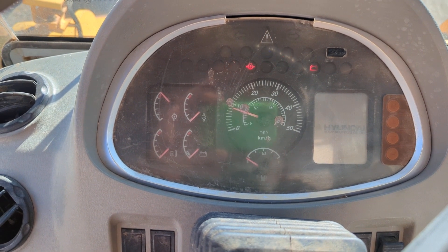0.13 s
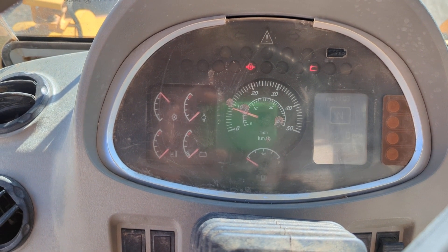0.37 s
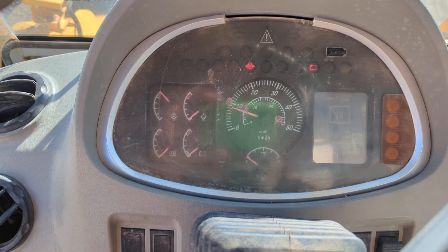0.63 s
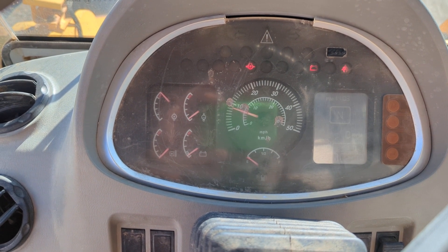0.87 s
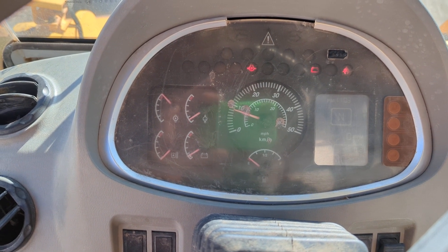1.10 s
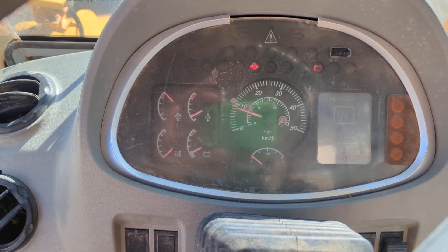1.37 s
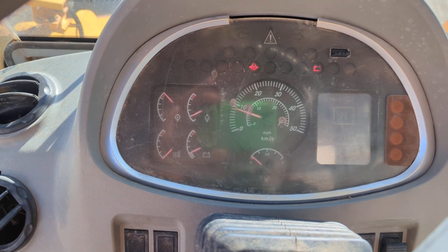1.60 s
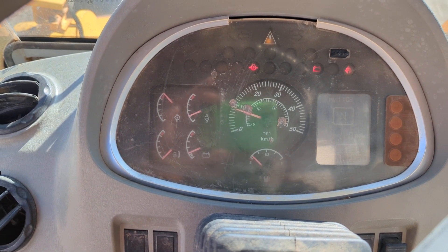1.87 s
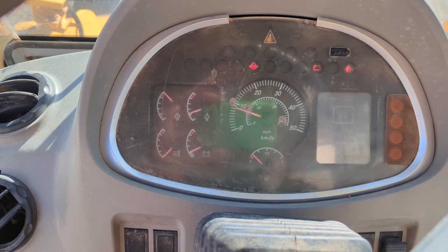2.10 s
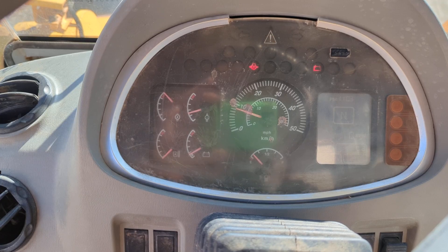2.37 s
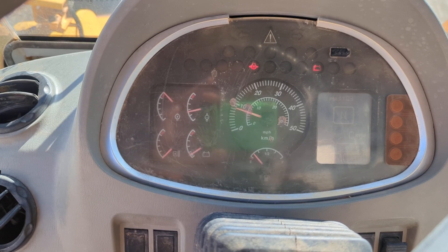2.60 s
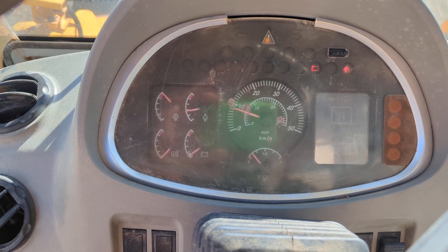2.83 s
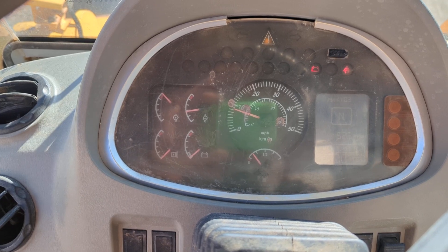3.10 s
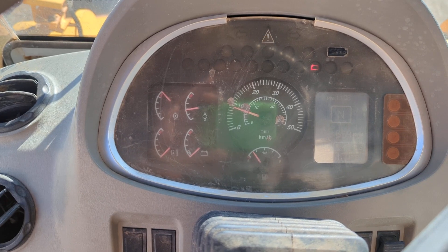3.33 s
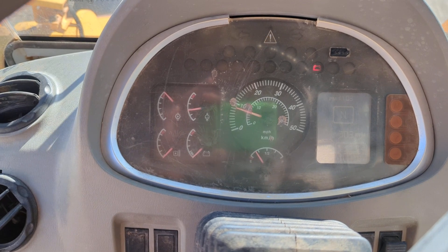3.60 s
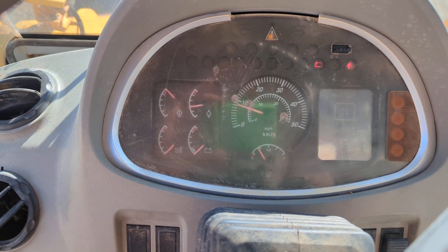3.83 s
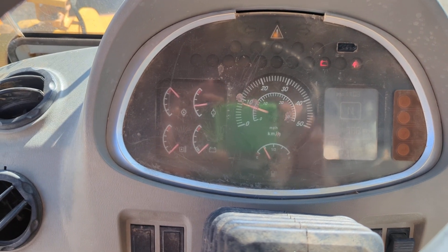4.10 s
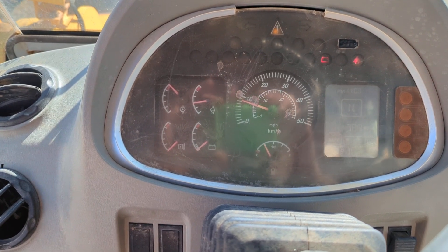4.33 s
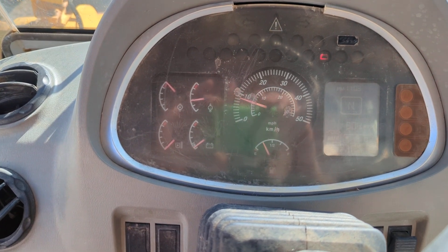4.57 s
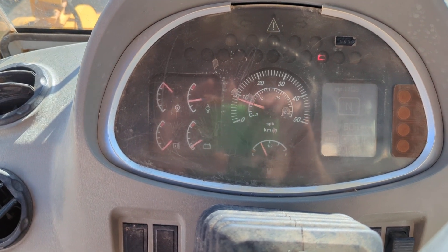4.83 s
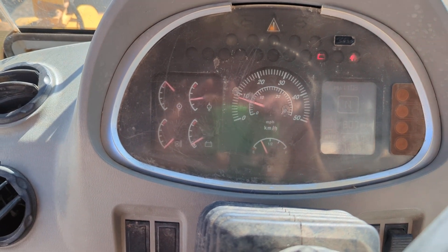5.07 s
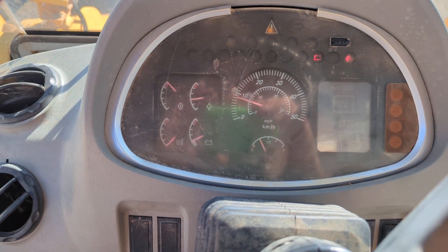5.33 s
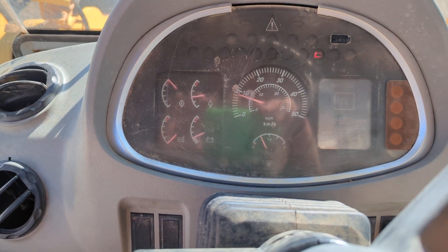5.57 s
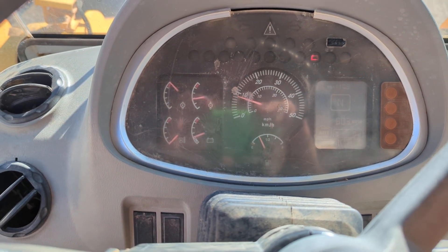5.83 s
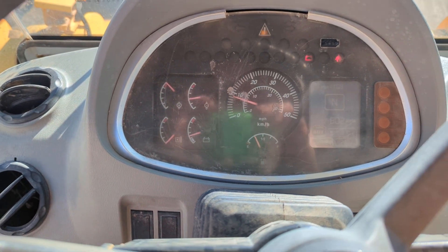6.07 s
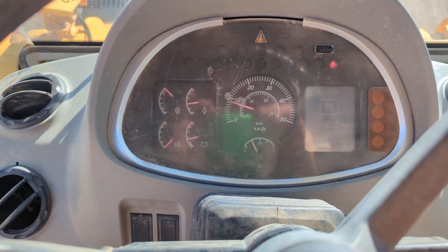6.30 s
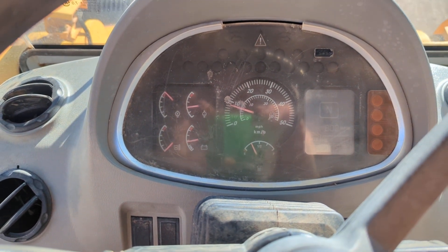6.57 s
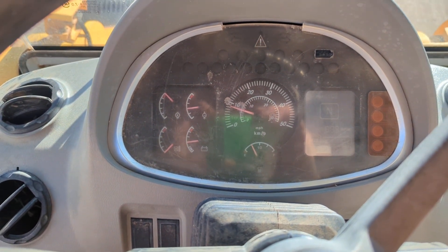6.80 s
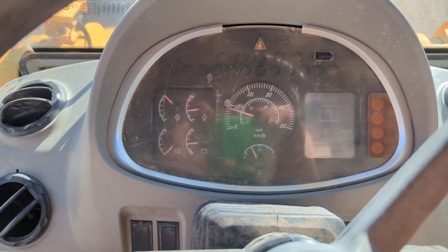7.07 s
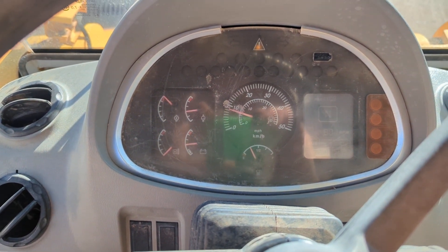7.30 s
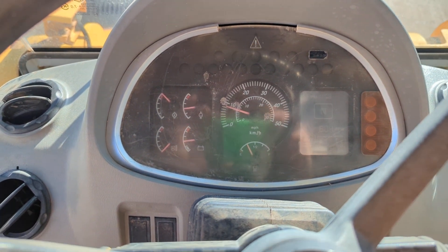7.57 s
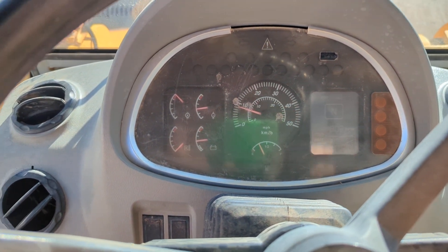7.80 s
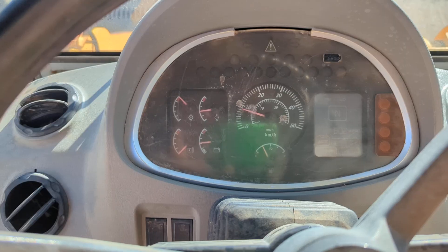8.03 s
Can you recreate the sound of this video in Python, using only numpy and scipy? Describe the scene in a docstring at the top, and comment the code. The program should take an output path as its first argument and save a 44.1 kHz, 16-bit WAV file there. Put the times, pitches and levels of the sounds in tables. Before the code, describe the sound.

Heard inside a heavy machine's cab on a hand-held phone: about a second of near silence, a small clack, then a geared starter whirs up and labours in rough, sagging pulses. A large diesel catches with slow puffs, gathers speed and settles into a deep, even drone with muffled clatter, pump whine and a wavering high rotor tone.

```python
"""Diesel start, inside the cab

A six-cylinder diesel is started, heard from inside the cab on a hand-held phone with two microphone ports.
The starter, an array of gear-mesh tones with grind and rasp, whines and sags against each compression.
The engine catches, runs up and idles: tones locked to the firing rate over pulsing noise; pumps and a rotor sing.
The phone filters its bass in 10 ms blocks, which mirrors the deepest tones around multiples of 100 Hz."""
import sys
import numpy as np
from scipy import signal
from scipy.fft import rfft, irfft, next_fast_len
from scipy.io import wavfile
from scipy.ndimage import uniform_filter1d, map_coordinates

SR = 44100
rng = np.random.default_rng(int(sys.argv[2]) if len(sys.argv) > 2 else 0)


def output_pcm(signal):
    """Save a mono or channel-first signal as 16-bit PCM at the path in sys.argv[1].

    Samples are clipped to [-1, 1] before scaling.
    """
    pcm = np.clip(np.atleast_2d(signal).T, -1, 1) * 32767
    wavfile.write(sys.argv[1], SR, np.round(pcm).astype(np.int16))


def volts_from_db(level):
    """Convert decibel levels to linear amplitude ratios."""
    exponent = np.asarray(level, float) / 20
    return 10 ** exponent


N = 360297
TIME = np.arange(N) / SR  # s

# Cab air swaying on its mounts [t/s, relative level/dB]
SWAY = [(0, -37), (.2, -39), (.75, -49), (1.1, -45), (1.5, -44), (2.28, -44), (2.44, -28.5), (2.65, -21),
        (3.5, -39.5), (8.17, -39)]
# The cranked engine lurches on its mounts [t/s, relative peak level/dB, half length/s]
LURCHES = [(1.207, -26.5, 0.037), (1.314, -29, .03), (1.392, -19, .03), (1.565, -26.5, .03),
           (1.72, -29.5, 0.03), (1.783, -33, 0.031), (1.848, -30, 0.057), (1.988, -26.5, 0.023),
           (2.058, -24, .025), (2.23, -27, 0.034), (2.337, -25, 0.023), (2.391, -19.5, 0.031),
           (2.52, -17, .02), (2.575, -15.5, 0.022)]
# Colour of the cab sway [f/Hz, density/dB]
SWAY_COLOUR = [(18, -50), (30, -24), (43, -1), (59, 0), (70, -16.5), (80, -26), (100, -42), (180, -120)]
# Colour of the still air [f/Hz, density/dB]
STILL_AIR_COLOUR = [(53, -33), (80, 6), (100, -3), (154, -8), (190, -30), (222, -7), (274, -12.5),
                    (305, -6.5), (420, -32), (532, -14), (1060, -22), (1730, -22.5), (2430, -37.5),
                    (15000, -62)]
# Clacks of key, relay, pinion and loose trim
# [t/s, relative level/dB, centre f/Hz, ring to -60 dB/s, sharp edge 0-1]
TICKS = [(1.016, -55, 2200, 0.16, 0), (1.087, -59, 2000, .08, 0), (1.1, -52, 2500, 0.12, 0.1),
         (1.126, -32.5, 3340, 0.11, 0.3), (2.62, -40, 10900, 0.065, 0.3), (5.108, -46, 4500, .004, 1),
         (5.308, -35, 4500, .004, 0.93), (7.152, -42, 4500, .004, 1), (7.5797, -24.5, 3570, 0.0054, 0.87)]

# Starter spinning up over the first turn [t/s, tooth mesh f/Hz, whine level/dB, grind level/dB]
SPIN_UP = [(1.083, 300, -76, -64), (1.09, 295, -75, -49.5), (1.122, 402, -66, -46),
           (1.13, 500.4, -45, -36.5), (1.2, 760, -49, -35.5), (1.3, 1000, -38.5, -35),
           (1.35, 1143, -39.5, -39), (1.39, 1081, -36.5, -33), (1.43, 1002, -36, -34.5),
           (1.48, 768, -52, -35.5)]
# Compressions that brake the starter [t/s, length/s, mesh f at the start/Hz, sag/Hz, whine level/dB]
STROKES = [(1.537, .093, 742.6, 226, -37), (1.687, .083, 768, 170.2, -36),
           (1.827, 0.075, 778.6, 137.5, -36), (1.961, 0.069, 773, 149, -35),
           (2.086, .079, 781.5, 161, -35.5), (2.237, 0.024, 855, 25, -35.5)]
# Shape of a stroke, levels over the stroke's whine
# [share of its length, share of the sag, whine level/dB, grind level/dB]
STROKE_SHAPE = [(0, 0, 0, -1), (.68, .75, -7, 4), (1, 1, -14.5, -2.5)]
# The mesh, its overtones and lower tones of unevenly worn teeth [multiple of mesh, relative level/dB]
TEETH = [(.25, -9), (.5, -12), (1, 0), (1.5, -9), (1.75, -9), (2, -1), (3, -14), (4, -14), (6, -19),
         (8, -25)]
# Starter housing resonances [f/Hz, width/Hz, gain/dB]
HOUSING = [(745, 45, -3), (1090, 90, 1), (1470, 120, 0), (1700, 120, -5), (2250, 150, -9), (4480, 150, -8),
           (6300, 100, -10)]
# Colours of the starter grind, its rasp and the ringing lowest housing mode [f/Hz, density/dB]
GRIND_COLOUR = [(85, -30), (122, 5.5), (156, -3), (188, -25), (236, 1.5), (576, -13.5), (739, -0.5),
                (910, -8), (1070, -4.5), (1240, -9.5), (1500, 0.5), (3360, -19), (4410, -21.5),
                (5100, -31.5), (15000, -42.5)]
RASP_COLOUR = [(1470, -37), (2500, -2), (2760, -0.5), (3560, -18), (4320, -12), (4840, -14), (6290, -15),
               (9570, -29.5), (15000, -29)]
RINGING_COLOUR = [(660, -120), (700, -30), (735, -3), (745, 0), (757, -3), (795, -30), (850, -120)]

# Song of the belt-driven rotor [t/s, level/dB]
ROTOR = [(2.7, -62), (3.35, -48), (3.55, -40), (3.95, -68), (4.27, -36.5), (4.7, -35), (5.2, -33.5),
         (5.7, -32.5), (6.5, -35.5), (7.3, -28.5), (7.65, -32), (8.17, -28.5)]
# The song drops out briefly [t/s, depth/dB]
DROPOUTS = [(4.35, 22), (4.5, 20), (4.9, 33), (5.35, 18), (5.58, 12), (5.85, 25), (6.14, 24), (6.81, 7),
            (7.57, 15)]
# A whistle that rises during the run-up [t/s, f/Hz, relative level/dB]
WHISTLE = [(3.3, 1030, -60), (3.4, 1047, -47), (3.7, 1085, -40), (3.9, 1137, -43), (3.98, 1150, -62)]

# Running engine [t/s, relative clatter level/dB]
CLATTER_LEVEL = [(2.25, -56), (2.48, -39), (2.63, -36.5), (2.74, -37.5), (4.23, -37), (4.74, -35),
                 (6.04, -34.5), (7.21, -35.5), (7.48, -32), (7.74, -34.5), (8.17, -35.5)]
# Colours of the clatter, drone and hiss [f/Hz, density/dB]
CLATTER_COLOUR = [(240, -49), (400, -12), (433, -14), (540, -3.5), (607, -11.5), (852, -11.5), (1280, -8),
                  (1530, -8.5), (1890, -10.5), (2070, -16), (2900, -24), (3660, -27.5), (9000, -50.5),
                  (11700, -81), (19800, -120)]
DRONE_COLOUR = [(50, -44), (85, -1), (119, -3), (156, -6.5), (188, -24), (224, -3.5), (269, -6.5),
                (340, -3.5), (443, -23), (520, -16.5), (680, -44), (1140, -120)]
HISS_COLOUR = [(2940, -22), (5000, -19), (6310, 3.5), (7240, -4), (8080, 2.5), (9910, -7), (11900, -2),
               (15000, -8.5), (15600, -12.5)]
# Dips that cab reflections cut into the noise [f/Hz, width/Hz, depth 0-1]
DIPS = [(847, 25, 0.73), (2860, 43, 0.3), (4150, 31, 0.5), (5000, 66, 0)]

# Engine speed [t/s, firings per s]
SPEED = [(2.2, 12.0), (2.66, 24.1), (2.82, 29.7), (3.0, 32.85), (3.15, 35.0), (3.3, 35.67), (3.5, 37.24),
         (3.7, 37.89), (3.9, 39.17), (4.1, 40.22), (4.3, 40.5), (4.6, 40.46), (5.2, 40.19), (5.8, 40.1),
         (6.4, 39.98), (7.0, 40.05), (7.3, 40.5), (7.6, 40.01), (7.9, 40.1), (8.17, 40.66)]
# Exhaust boom [multiple of the firing rate, relative level/dB, waver/dB]
EXHAUST = [(1, 0, 0.4), (2, -11.5, 1), (3, -22, 2)]
# How the cab answers the boom at each pitch [f/Hz, rms level/dB]
CAB_ANSWER = [(12, -72), (24, -50), (30, -48), (33, -43), (35.3, -24), (37.5, -17), (40, -17), (48, 0),
              (53, 0), (60, -4), (66, -14.5), (72, -10.5), (80, -14.5), (90, -5.5), (100, -7), (108, -22),
              (120, -18)]
# Weaker tones that follow the first exhaust order [multiple of the firing rate, level relative to it/dB]
MINOR = [(4 / 3, -19.5), (7 / 3, -36), (4, -16.5), (6, -28), (9, -27), (15, -34.5), (16, -32), (17, -37.5)]
# Pump as the oil pressure builds [t/s, pistons level/dB, gear teeth level/dB]
PRESSURE = [(2.2, -58, -80), (2.7, -38, -68), (3.2, -48, -67), (3.55, -35, -60), (3.9, -42.5, -60),
            (4.15, -36, -39.5), (4.6, -42.5, -45.5), (5.2, -33.5, -39.5), (6.2, -31.5, -38),
            (7.0, -32, -38.5), (8.17, -32, -45)]
# Pump pistons [multiple of the firing rate, relative level/dB]
PISTONS = [(6, -9), (8, 0.5), (12, -11)]
# Pump gear teeth [multiple of the firing rate, relative level/dB]
GEAR = [(32, 0.5), (48, -1)]
# A third gear tone comes and goes [t/s, level/dB]
THIRD_GEAR = [(4.3, -63), (4.6, -35), (6.15, -47), (6.4, -56), (7.1, -63), (7.3, -38), (7.6, -52),
              (8.17, -68)]
# Pump overtones that follow the gear teeth [multiple of the firing rate, level relative to them/dB]
PUMP_OVERTONES = [(30, -22), (40, -16), (44, -8), (52, -15), (56, -10), (60, -23.5), (64, -15), (68, -18.5),
                  (113, -32.5), (133, -36)]
# Pump orders that sweep through a panel resonance [multiple of the firing rate, level at resonance/dB]
SWEEPING = [(14, -46.5), (16, -46.5), (18, -47)]
LOW_SWEEPING = [(12, -29), (16, -39)]
# The two panel resonances (f/Hz, width/Hz)
PANEL = (532, 48)
LOW_PANEL = (328, 44)

# Likeness of the two microphone ports [f/Hz, likeness, held within -1 to 1]
ALIKE = [(60, 1), (130, 0.63), (300, 1.36), (640, 0.62), (1400, 0.44), (3000, 0.29), (8000, 0.04)]
# Phase by which the left port leads for a source fully aside [f/Hz, lead/rad]
LEAD = [(0, 0), (690, 0.95), (1550, 3), (2000, 6), (16000, 48)]
# Left port over right [f/Hz, level/dB]
BALANCE = [(60, 0.0), (120, -0.5), (240, 0.0), (480, 0.0), (950, -0.5), (1890, -2.0), (3770, 3.5),
           (7520, 2.0), (15000, -0.5)]
# Loss of the deepest bass in both ports [f/Hz, gain/dB]
LOW_CUT = [(15, -40), (28, -31.5), (36, 0)]
# What the phone's block filter acts on [f/Hz, gain/dB]
DEEP = [(25, -18), (35, 1.5), (50, -6), (62, -14.5), (75, -31), (100, -63)]
# How strongly the mirror tones come out [f/Hz, gain/dB]
MIRROR = [(15, -42), (35, -1), (60, 8.5), (100, -6), (140, -8), (160, -10.5), (240, -22), (265, -19.5),
          (340, -32.5), (500, -50)]


def unit(x):
    """Scaled to rms 1."""
    return x / np.sqrt(np.mean(x ** 2) + 1e-20)


def along(points, hz):
    """Reads a table of (Hz, value) on a log frequency axis."""
    f, v = np.transpose(points)
    return np.interp(np.log(hz + 1), np.log(f + 1), v)


def curves(rows, before=-120):
    """One value per sample for each column after the time."""
    s, *cols = np.transpose(rows)
    return [np.interp(TIME, s, c, left=before) for c in cols]


def bumps(rows):
    """Sum of bell shapes from rows (s, height, half length s)."""
    return sum(height * np.exp(-((TIME - s) / half) ** 2) for s, height, half in rows)


def wobble(rate):
    """A smooth random curve, rate knots a second."""
    return map_coordinates(rng.standard_normal(int(N * rate / SR) + 4), [TIME * rate])


def filtered(x, response):
    """x times a complex response of frequency."""
    m = next_fast_len(N + 8192)
    return irfft(rfft(x, m) * response(np.fft.rfftfreq(m, 1 / SR)), m)[..., :N]


def rush(colour, gate=1):
    """Two unrelated paths of coloured noise, both gated alike, rms 1."""
    noise = gate * rng.standard_normal((2, N))
    return unit(filtered(noise, lambda hz: volts_from_db(along(colour, hz))))


def tone(phase, db, waver_db):
    """A sine of rms db that wavers in level; its second path arrives with a drifting phase."""
    drift = np.array([0 * TIME, 2.06 * wobble(3)])
    return np.sqrt(2) * volts_from_db(db + waver_db * wobble(5)) * np.cos(phase + drift)


def cab():
    """Still air as steady coloured noise, and the deep rocking of the cab, strongest before an even run."""
    rocking = volts_from_db(curves(SWAY)[0] + 3.3 * wobble(14))
    rocking = rocking + bumps([(s, volts_from_db(db), half) for s, db, half in LURCHES])
    sway = rush(SWAY_COLOUR)
    # a lightly damped sway keeps its size for a few cycles
    sway /= np.sqrt(uniform_filter1d(sway ** 2, 1800)) + 0.23
    still_air = volts_from_db(-52.0 + 0.72 * wobble(4)) * rush(STILL_AIR_COLOUR)
    return rocking * volts_from_db(0.5) * unit(sway) + still_air


def ticks():
    """Each clack, close to both ports, is a sharp edge and a dying noisy ring around its centre."""
    out, t = np.zeros((2, N + SR)), np.arange(SR // 6) / SR
    for s, db, hz, ring, edge in TICKS:
        envelope = volts_from_db(-60 * t / max(ring, .002)) * (1 - np.exp(-t / 0.0021))
        noise = rng.standard_normal((3, len(t))) * envelope
        clack = .5 * (noise[0] + noise[1:])  # one part shared by both ports
        clack[:, 0] = -5 * edge
        band = signal.butter(2, [hz / 2.2, min(hz * 1.6, 20000)], "band", fs=SR)
        start = round(s * SR)
        out[:, start:start + len(t)] += volts_from_db(db + 6) * signal.lfilter(*band, clack)
    return out[:, :N]


def starter_controls():
    """Mesh Hz, whine dB and grind dB: the spin-up, then each stroke bites, sags and lets the pinion run free."""
    bite_s, release_s = .01, 2.35  # how fast a stroke loads up; when the pinion drops out
    free_whine_db, free_grind_db = -26, -5.5  # running free, relative to the next stroke's whine
    louder_db_per_hz = 0.0491  # the further the mesh sags, the louder it labours
    rows = list(SPIN_UP)
    for s, length, hz, sag, db in STROKES:
        rows.append((s - bite_s, hz, db + free_whine_db, db + free_grind_db))
        for share, sag_share, whine, grind in STROKE_SHAPE:
            sagged = sag_share * sag
            whine_db = db + whine + louder_db_per_hz * sagged
            rows.append((s + share * length, hz - sagged, whine_db, db + grind))
    last_hz = rows[-1][1]
    rows += [(release_s, last_hz, -90, -46.5), (release_s + 0.11, last_hz, -120, -70),
             (release_s + .2, last_hz, -120, -120)]
    return curves(rows)


def starter():
    """Worn pinion teeth whine roughly at the mesh rate and grind; the whine rings the housing.
    Against a compression the mesh slows, loads up, turns rougher and brighter, and rasps."""
    mesh_hz, whine_db, grind_db = starter_controls()
    load = np.clip((1000 - mesh_hz) / 250, 0, 1)
    roughness = .021 + .017 * load
    mesh = 2 * np.pi * np.cumsum(mesh_hz * (1 + roughness * wobble(300))) / SR

    whine = 0
    for k, db in TEETH:
        # load weakens the mesh tone itself; running free weakens the high overtones
        brightness_db = -6 * load * (k == 1) - 7 * (1 - load) * (k > 4)
        rough_db = (3.5 + load) * wobble(150)
        whine = whine + tone(k * mesh, whine_db + db + brightness_db + rough_db, waver_db=.8)

    def housing(f):
        return 0.54 + sum(volts_from_db(db) / (1 + (2 * (f - c) / w) ** 2) for c, w, db in HOUSING)

    whine = volts_from_db(-.5) * filtered(whine, housing)
    grind = volts_from_db(grind_db - 1.06) * rush(GRIND_COLOUR, volts_from_db(1.1 * wobble(200)))
    rasp = load * volts_from_db(whine_db - 10) * rush(RASP_COLOUR, volts_from_db(1.9 * wobble(400)))
    # grit rings the lowest housing mode
    ringing = load * volts_from_db(grind_db - 12.5) * rush(RINGING_COLOUR, volts_from_db(3 * wobble(30.2)))
    return whine + grind + rasp + ringing


def firing_phase():
    """Radians of the firing cycle, the running sum of the engine speed."""
    crank_start = 4.05  # phase at time zero, rad
    return 2 * np.pi * np.cumsum(curves(SPEED, before=0)[0]) / SR + crank_start


def rotor(phase):
    """The slot tone swells once a turn and bends in pitch with it; belt slip lets it drift; a whistle rises."""
    turns_per_firing, slots = .3785, 36
    turn = turns_per_firing * phase + 2.6
    swell = 1 + 0.5 * np.cos(turn) + 0.22 * np.cos(2 * turn + wobble(5.1))
    bend_and_slip = -.5 * np.sin(turn) + .6 * wobble(3) + .22 * wobble(25)
    dropout_db = bumps([(s, db, 0.041) for s, db in DROPOUTS])  # half length 0.041 s
    song = swell * tone(slots * turn + bend_and_slip, curves(ROTOR)[0] - dropout_db, waver_db=0.3)
    hz, db = curves(WHISTLE)
    whistle_phase = 2 * np.pi * np.cumsum(hz + 16 * wobble(40)) / SR
    return song + tone(whistle_phase, db + 2, waver_db=1.5)


def engine_noise(phase):
    """Combustion clatter and drone pulse a little with each firing, the clatter unevenly by cylinder; hiss."""
    clatter_db, = curves(CLATTER_LEVEL)
    over_idle_db = clatter_db + 35
    # drone and hiss follow the clatter by a fraction of a dB per dB
    drone_db = -32 + 0.37 * over_idle_db + 1.33 * wobble(3.5)
    hiss_db = -57 + 0.42 * over_idle_db
    cylinder_db = 0.19 * np.cos(phase / 6 + 1) + 0.5 * np.cos(phase / 3)
    # the first slow firings stand apart as puffs, until about 2.7 s
    puff_db = 0.58 + 3 * np.clip((2.7 - TIME) / 0.58, 0, 1)
    knock = volts_from_db(cylinder_db + puff_db * np.cos(phase) + 0.47 * wobble(9))
    clatter = volts_from_db(clatter_db + 4) * rush(CLATTER_COLOUR, knock)
    drone = volts_from_db(drone_db) * rush(DRONE_COLOUR, volts_from_db(1.6 * np.cos(phase) + 1.05 * wobble(6)))
    hiss = volts_from_db(hiss_db + 1.34 * wobble(6)) * rush(HISS_COLOUR)
    ripple_db = 2.2 * rng.standard_normal(500)  # the cab's many small modes, one per 35 Hz

    def walls(hz):
        dips = np.prod([1 - depth / (1 + (2 * (hz - c) / w) ** 2) for c, w, depth in DIPS], axis=0)
        return volts_from_db(np.interp(hz / 35, np.arange(500), ripple_db)) * dips

    return filtered(clatter + hiss, walls) + drone


def through(orders, phase, panel):
    """Orders heard through one panel resonance, loudest as they sweep across it."""
    centre, width = panel
    sweeping = sum(tone(k * phase, db, waver_db=2) for k, db in orders) * (TIME > 2.4)
    return filtered(sweeping, lambda hz: 1 / (1 + (2 * (hz - centre) / width) ** 2))


def engine_tones(phase):
    """Exhaust and pump orders of the firing rate; the higher the order, the more speed flutter blurs it."""
    phase = phase + .012 * wobble(12)
    speed, = curves(SPEED, before=0)
    pistons_db, teeth_db = curves(PRESSURE)
    firing = speed > 0
    boom = sum(tone(k * phase, db + along(CAB_ANSWER, k * speed), waver) for k, db, waver in EXHAUST)
    minor = sum(tone(k * phase, along(CAB_ANSWER, speed) + db, waver_db=2) for k, db in MINOR)
    pistons = sum(tone(k * phase, pistons_db + db, waver_db=0.056 * k) for k, db in PISTONS)
    gear = sum(tone(k * phase, teeth_db + db, waver_db=2) for k, db in GEAR)
    third_gear = tone(45 * phase, curves(THIRD_GEAR)[0], waver_db=2.5)
    overtones = sum(tone(k * phase, teeth_db + db, waver_db=4.0) for k, db in PUMP_OVERTONES)
    panels = through(SWEEPING, phase, PANEL) + through(LOW_SWEEPING, phase, LOW_PANEL)
    return (boom + minor) * firing + pistons + gear + third_gear + overtones + panels


def microphones(paths, aside=1):
    """The two paths mix by likeness; the left port leads for a source aside; both lose the deepest bass."""
    def share(hz):
        turn = np.arccos(np.clip(along(ALIKE, hz), -1, 1)) / 2
        return volts_from_db(along(LOW_CUT, hz)) * np.array([np.cos(turn), np.sin(turn)])

    def near(hz):
        # half of the balance and lead to each port
        return volts_from_db(along(BALANCE, hz) / 2) * np.exp(.5j * aside * np.interp(hz, *np.transpose(LEAD)))

    mid, side = filtered(paths, share)
    ports = np.array([mid + side, mid - side])
    return filtered(ports, lambda hz: np.array([near(hz), 1 / near(hz)]))


def scene():
    """Everything in the cab at both ports; the starter lies less far aside than the engine."""
    phase = firing_phase()
    engine_and_cab = engine_tones(phase) + rotor(phase) + engine_noise(phase) + cab()
    return microphones(engine_and_cab) + microphones(starter(), aside=0.22) + ticks()


def low_pass(x):
    """Removes everything above the highest recorded frequency."""
    return signal.sosfilt(signal.butter(12, 15710, fs=SR, output="sos"), x)


def record(dry):
    """The phone chops the deepest bass once a block, so a tone f also sounds at 100 - f, 100 + f, 200 - f and on."""
    deep = filtered(dry, lambda hz: volts_from_db(along(DEEP, hz)))
    block = 2 * np.pi * 100 * TIME + 2.135  # 100 blocks a second; start phase in rad
    chop = np.cos(block) + np.cos(2 * block) + np.cos(3 * block)
    mirrored = filtered(deep * chop, lambda hz: volts_from_db(along(MIRROR, hz)))
    return low_pass(dry + mirrored)


dry = scene()
out = record(dry)
output_pcm(out)
```